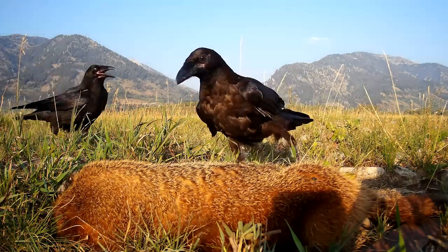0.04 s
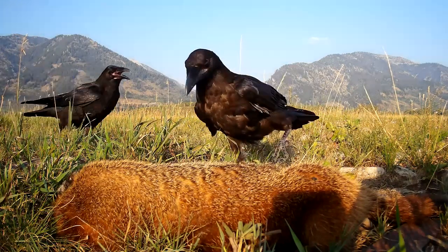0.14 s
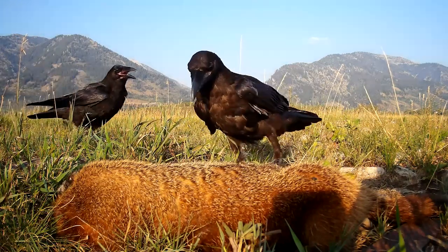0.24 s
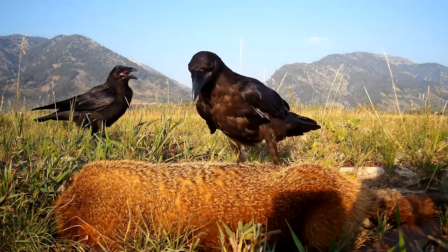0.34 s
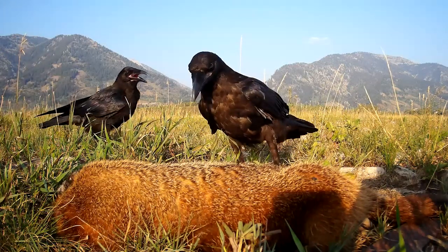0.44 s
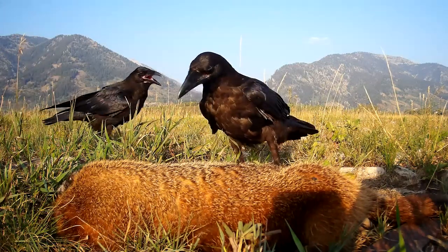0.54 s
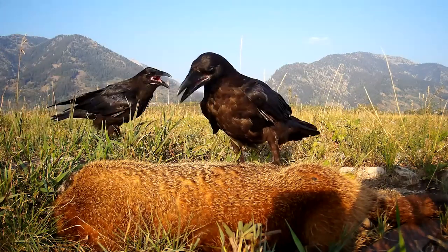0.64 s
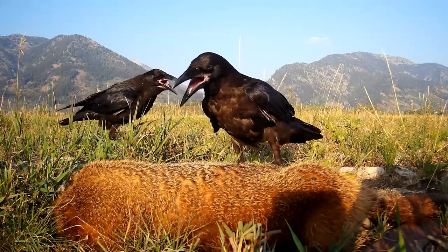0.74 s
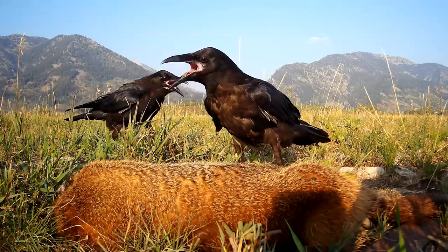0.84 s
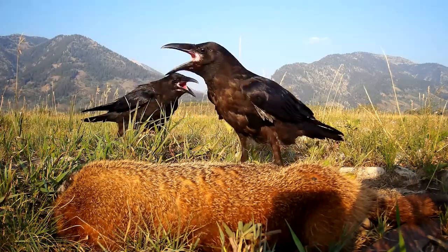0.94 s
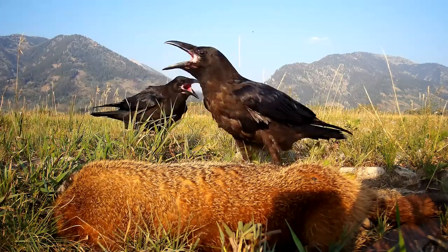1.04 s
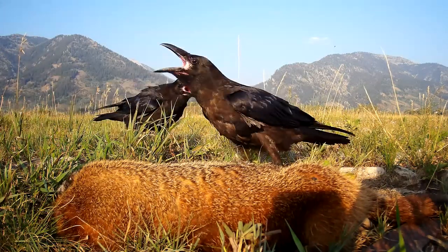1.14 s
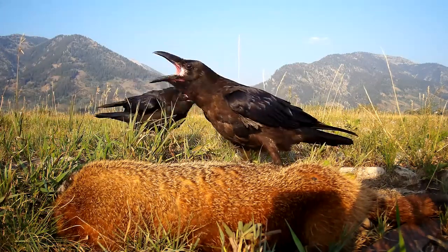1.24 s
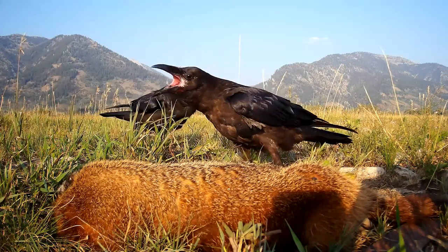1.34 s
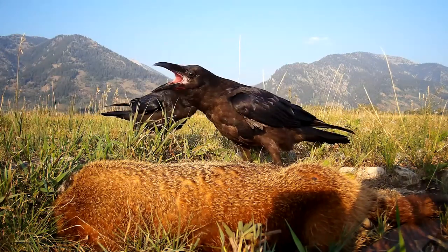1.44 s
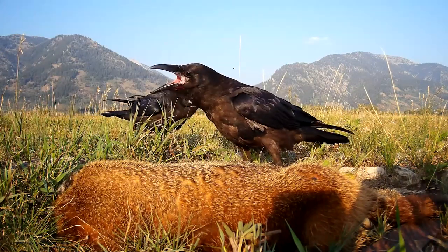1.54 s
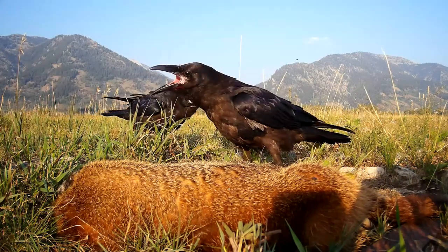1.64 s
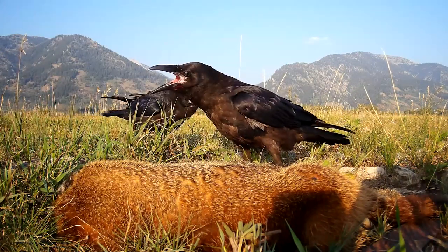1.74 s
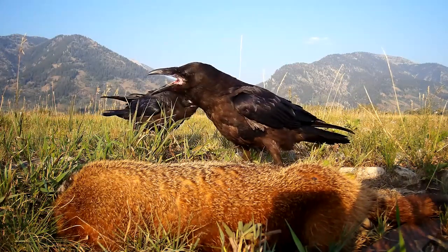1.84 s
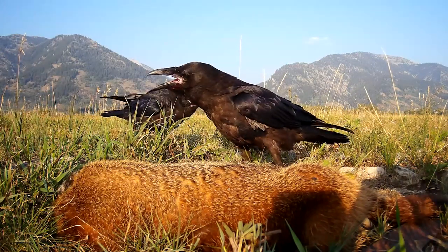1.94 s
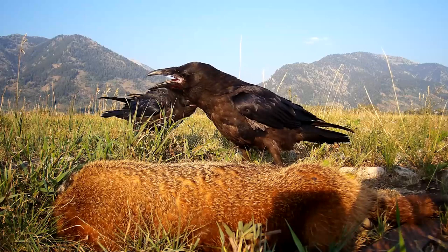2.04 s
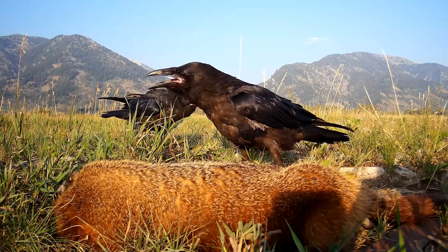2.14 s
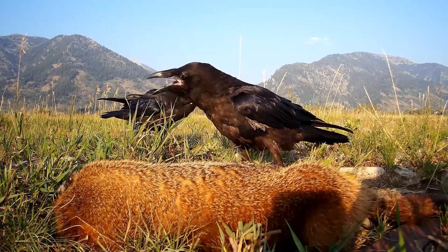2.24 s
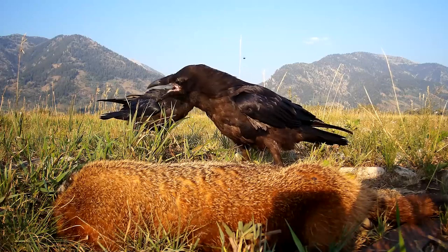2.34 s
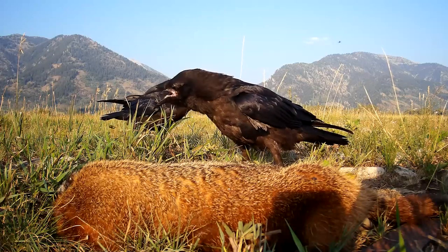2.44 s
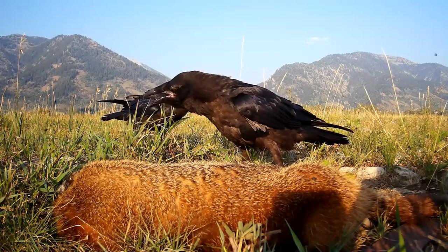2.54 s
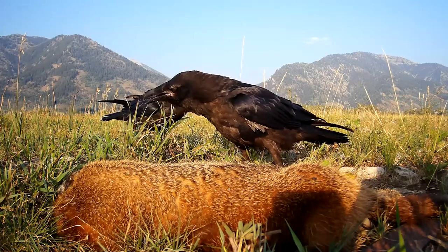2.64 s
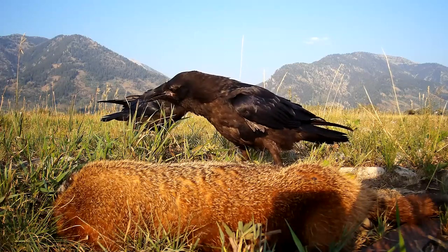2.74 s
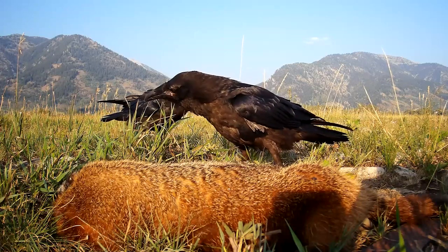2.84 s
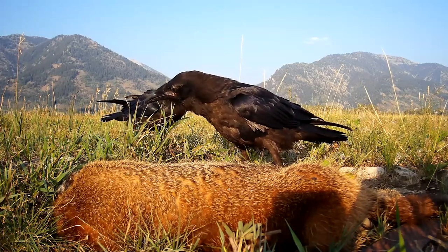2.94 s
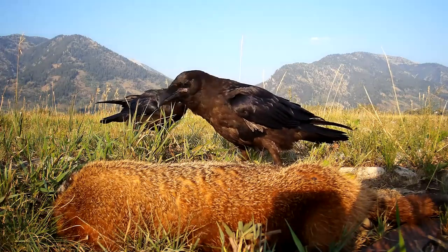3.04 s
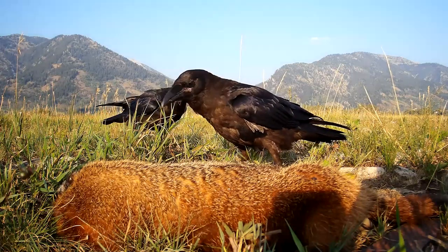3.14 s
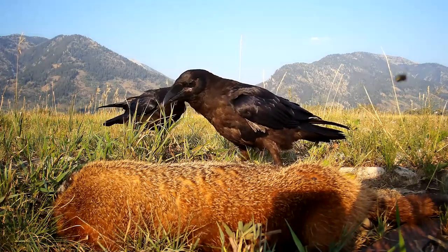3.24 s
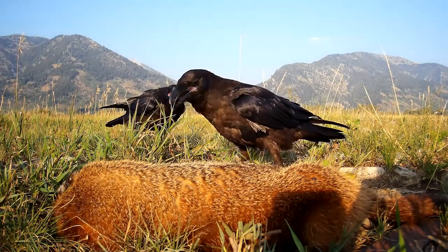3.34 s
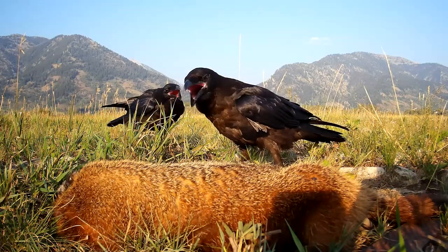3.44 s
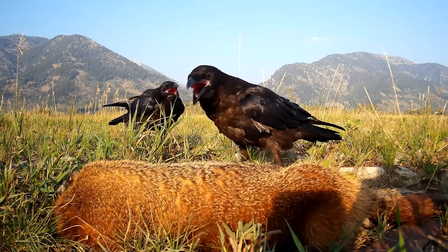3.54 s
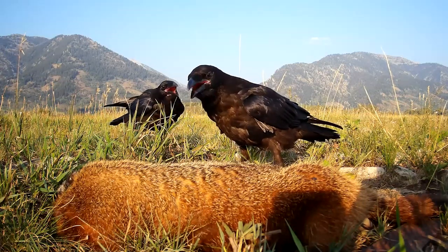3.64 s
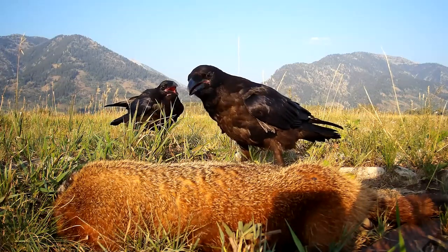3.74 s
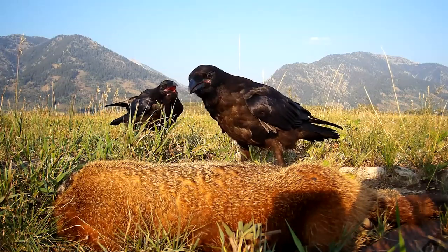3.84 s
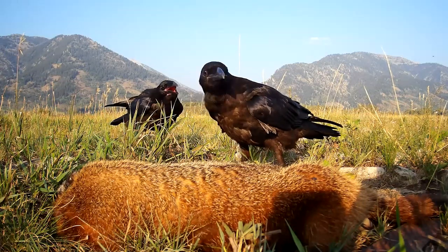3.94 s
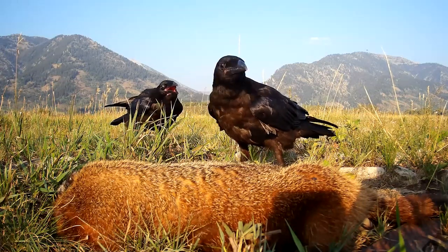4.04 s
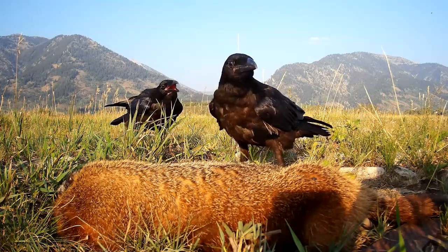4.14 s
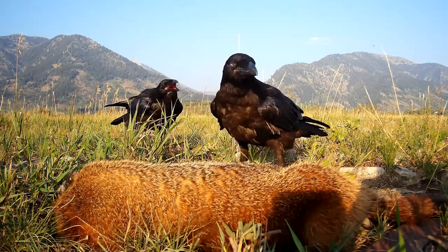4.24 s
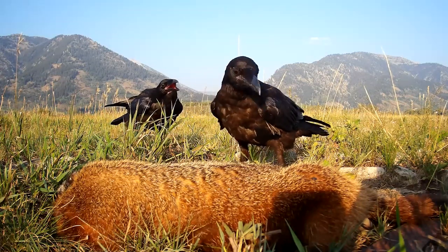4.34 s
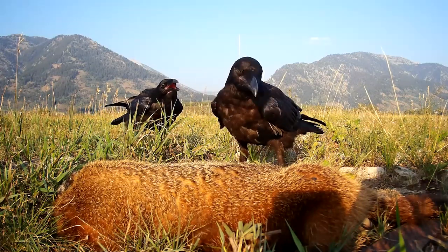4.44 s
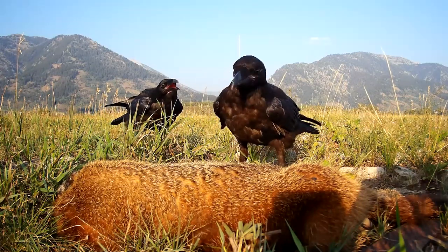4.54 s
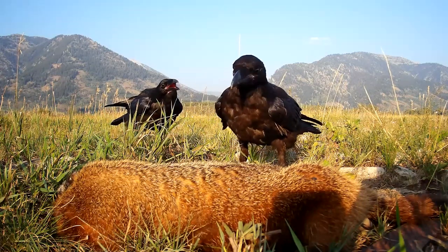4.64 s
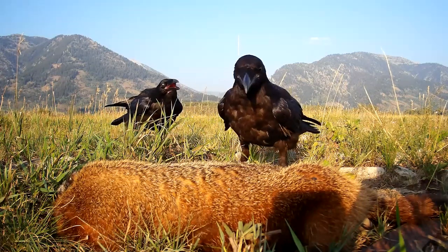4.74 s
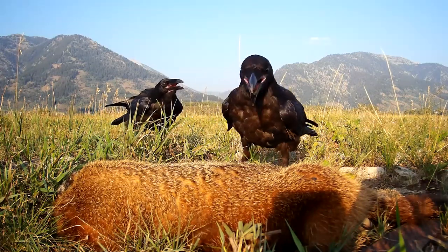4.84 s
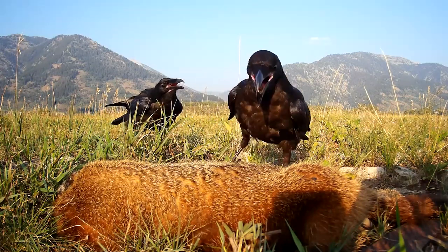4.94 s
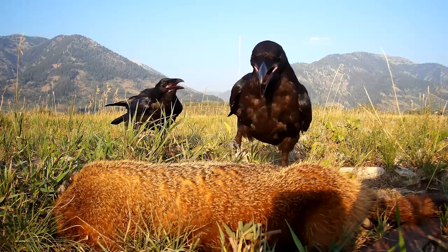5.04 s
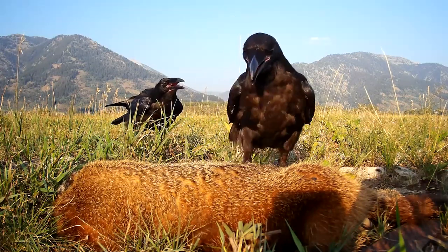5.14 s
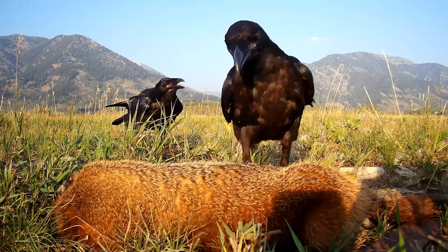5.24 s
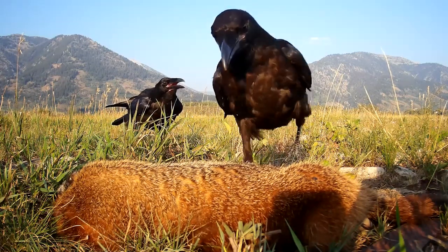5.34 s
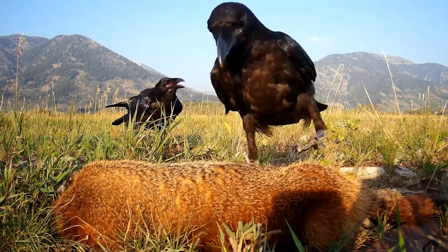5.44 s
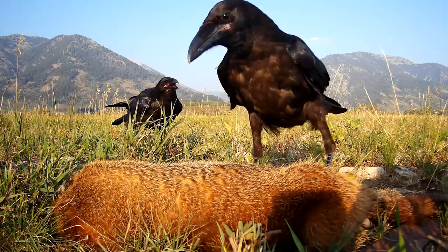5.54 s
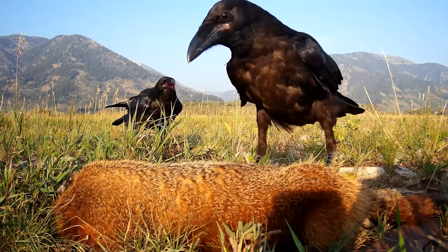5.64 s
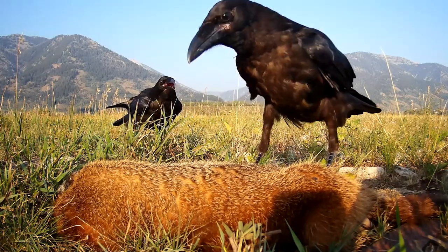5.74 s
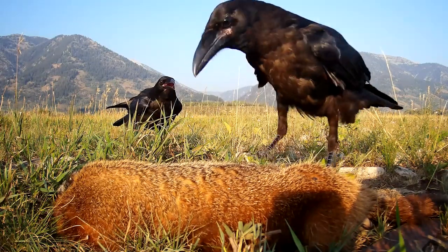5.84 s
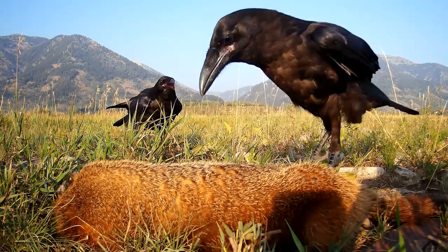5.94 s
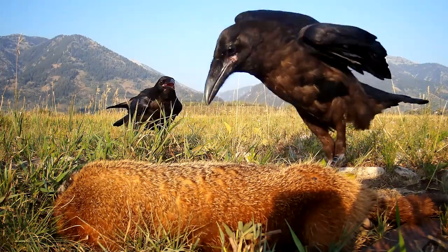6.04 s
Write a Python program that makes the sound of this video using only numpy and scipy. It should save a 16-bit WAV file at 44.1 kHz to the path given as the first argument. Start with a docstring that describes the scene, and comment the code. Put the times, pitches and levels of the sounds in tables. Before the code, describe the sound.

Hoarse, rasping raven caws overlap with a higher, clearer caller, then thin out to single falling croaks over very quiet outdoor air.

```python
"""Over still air, a far engine's drone and brushes in the grass, two young ravens beg in an open meadow.
A pop and a thin whistle lead into their first caws, one hoarse and low, one higher and clearer, at times together.
Each caw is a train of syrinx pulses: the pitch scoops up, drifts, flutters fast and slides down at the end;
voice and rasp weaken as it falls. A fly, a buzz of wingbeat harmonics, joins midway; a faint echo follows the birds.
The clear bird calls last near 3.3 s, the hoarse one near 5 s; grass, fly and engine remain."""
import sys
import numpy as np
from scipy import signal
from scipy.fft import rfft, irfft, next_fast_len
from scipy.io import wavfile
from scipy.ndimage import uniform_filter1d, map_coordinates

SR = 44100
rng = np.random.default_rng(int(sys.argv[2]) if len(sys.argv) > 2 else 0)


def output_pcm(signal):
    """Save a mono or channel-first signal as 16-bit PCM at the path in sys.argv[1].

    Samples are clipped to [-1, 1] before scaling.
    """
    pcm = np.clip(np.atleast_2d(signal).T, -1, 1) * 32767
    wavfile.write(sys.argv[1], SR, np.round(pcm).astype(np.int16))


N = 268128

# resonances of the hoarse bird's throat: (frequency [Hz], gain [dB])
HOARSE_THROAT_GAIN = [(80, -55.5), (160, -22), (280, -4.5), (380, -6.5), (490, -12.5), (620, -10),
                      (850, -8.5), (1250, -0.5), (1550, -2), (1750, -0.5), (1980, -7), (2200, -18.5),
                      (3300, -23)]


def amp(db):
    """Decibels to gain."""
    return 10 ** (np.asarray(db) / 20)


def unit(x):
    """Scale to rms 1."""
    return x / np.sqrt(np.mean(x ** 2) + 1e-20)


def along(points, hz):
    """Read (Hz, value) points on a log frequency axis."""
    f, v = np.transpose(points)
    return np.interp(np.log(hz + 1), np.log(f), v)


def curves(rows, t):
    """Read each column after the first at the times t."""
    s, *cols = np.transpose(rows)
    return [np.interp(t, s, c) for c in cols]


def wobble(t, knots_per_s):
    """Smooth random curve through normally distributed knots."""
    knots = (t - t[0]) * knots_per_s
    return map_coordinates(rng.standard_normal(int(knots[-1]) + 4), [knots])


def coloured(x, db_of_hz):
    """Causal minimum-phase filter with the given gain in dB, by folding the cepstrum."""
    m = 2 * next_fast_len(len(x) // 2 + 4096)
    cepstrum = irfft(np.log(amp(db_of_hz(np.fft.rfftfreq(m, 1 / SR)))), m)
    cepstrum[1:m // 2] *= 2
    cepstrum[m // 2 + 1:] = 0
    response = np.exp(rfft(cepstrum))
    return irfft(rfft(x, m) * response, m)[:len(x)]


def noise(spectrum):
    """Noise of rms 1 with the given spectrum."""
    return unit(coloured(rng.standard_normal(N), lambda hz: along(spectrum, hz)))


def steady(x, size):
    """Divide out the slow level, keep the flutter; size in samples."""
    power = uniform_filter1d(uniform_filter1d(x ** 2, size), size)
    return x / np.sqrt(np.abs(power) + 1e-12)


def ravens():
    """Hoarse and clear bird: each its own throat, beak and flutter shape."""
    # one row a caw, in four groups:
    # time: (start [s], end [s])
    # pitch: (aim [Hz], sag [Hz/s], opening scoop [share], closing slide [s])
    # effort: (voice [dB], rasp [dB], swell start to end [dB], attack [s], release [s],
    #          hardest push at [s], its surge [dB])
    # manner: (flutter at start [Hz], flutter at end [Hz], pitch swing [share], lower side [share],
    #          roughness [0-1], mouth at 1200 Hz [dB], mouth at 1750 Hz [dB],
    #          ring of the closing beak [Hz], its strength [dB])
    hoarse_caws = [ ((.772, 1.256), (752, 285, .39, .038), (-21.7, -28.3, 5.5, .0075, .004, .91, 4),
                   (66.03, 92, .046, .9, .05, 3.3, -1, 1730, 9.5)), ((1.355, 1.595), (665, 620, .29, .031),
                   (-25, -31.5, -1, .007, .009, 1.51, 2), (60.4, 56, .038, .76, .1, -.5, 0, 1850, 6)),
                   ((1.742, 1.913), (700, 1250, .27, .03), (-27, -35, 4.5, .007, .006, 1.765, 2),
                   (50, 56, .034, .69, .06, -1, .5, 1890, 2)), ((2.314, 2.6), (735, 560, .22, .044),
                   (-27.4, -40.5, 8, .005, .009, 2.52, 2.5), (67, 70, .034, .72, .05, 1, -3.5, 1610, 6.5)),
                   ((3.474, 3.655), (700, 1150, .31, .03), (-22.4, -30.5, -9.5, .008, .007, 3.51, 2.5),
                   (58, 52, .036, .7, .06, 1, -.5, 1720, -2.5)), ((4.942, 5.162), (692, 240, .15, .062),
                   (-25.5, -30.7, 1.5, .008, .004, 5.07, 2),
                   (96.1, 102, .044, .6, .14, -5.5, -1.5, 1770, 2))]
    clear_caws = [ ((.77, 1.09), (832, 0, 0, .056), (-31, -35, 0, .026, .008, .92, 2),
                  (69.48, 98, .09, .24, .1, 0, 5, 1400, -12)), ((1.262, 1.575), (795, -250, .125, .041),
                  (-25.5, -35.8, -.5, .01, .022, 1.42, 2), (52.3, 58, .05, .38, .45, .5, 6, 1650, 0)),
                  ((3.131, 3.462), (832, -130, 0, .056), (-24.8, -32.3, 12, .006, .028, 3.32, 6),
                  (70, 65, .06, .11, .09, -1, -1, 1620, -6))]
    # resonances of the clear bird's throat: (frequency [Hz], gain [dB])
    clear_throat = [(100, -50), (250, -28), (450, -7), (850, 1.5), (1200, -6), (1600, -0.5), (2100, -23),
                    (3100, -27)]
    # rasp colour of the open beak, one list per hoarse caw: (frequency [Hz], gain [dB])
    hoarse_beaks = [
        [(1650, -17), (2800, -10), (3810, -10.5), (4240, -4.5), (4860, 1), (5940, -3), (6420, -1.5), (8140, -9),
         (9120, -21), (10200, -19), (15500, -38)],
        [(1650, -24), (2800, -12), (3160, -16), (4150, -4), (5810, -2), (7680, -8), (9060, -23.5), (10800, -24),
         (11800, -35), (12800, -36), (15500, -44)],
        [(1650, -38.5), (2800, -9.5), (3190, -18.5), (4150, -1.5), (4890, -6), (5900, 0), (6760, -9),
         (7800, -10), (9260, -38), (14700, -40), (15500, -50.5)],
        [(1650, -32), (2800, -21), (3680, -10.5), (4460, 1), (5530, -8.5), (6330, -4), (7200, -20.5),
         (8430, -19), (9120, -48.5), (9940, -26), (12000, -29.5), (15500, -44)],
        [(1650, -16), (2800, -6), (3100, -20.5), (4330, -1), (4790, -9), (5410, 1.5), (6470, -6.5),
         (7150, -2.5), (9000, -18.5), (9320, -32), (10500, -15.5), (13100, -25), (15500, -26.5)],
        [(1650, -37), (2800, -6), (3620, -19), (4360, -0.5), (4620, -2.5), (5040, -11), (5940, 0),
         (6800, -11.5), (8020, -12), (8800, -31), (9530, -21), (10400, -24.5), (11500, -13), (15500, -38.5)],
    ]
    # the same for all clear caws: (frequency [Hz], gain [dB])
    clear_beak = [(2700, -15), (3050, -23), (3700, -13), (4400, -6.5), (5200, -1.2), (6300, -5.5),
                  (7300, -3), (9600, -19), (11700, -15), (14100, -23.5), (15500, -36)]
    # cracks in the hoarse voice: (time [s], boost [dB], half-length [s])
    voice_cracks = [(1.378, 11, .0045), (2.323, 5, .004), (2.380, 6, .0043), (2.411, 9.5, .003),
                    (3.488, 6.5, .0037)]
    hoarse = sum(caw(*row, beak, HOARSE_THROAT_GAIN, voice_cracks, rasp_fade_db_per_s=15,
                     spike=.5, lean=.25, throb_db=-.5, rasp_throb_db=2.5, rasp_lag_rad=1.2, scatter_s=.00001)
                 for row, beak in zip(hoarse_caws, hoarse_beaks))
    clear = sum(caw(*row, clear_beak, clear_throat, [], rasp_fade_db_per_s=2,
                    spike=.2, lean=.1, throb_db=3, rasp_throb_db=4.5, rasp_lag_rad=-.9, scatter_s=.000004)
                for row in clear_caws)
    return hoarse + clear


def caw(time, pitch, effort, manner, beak, throat, cracks, rasp_fade_db_per_s, spike, lean,
        throb_db, rasp_throb_db, rasp_lag_rad, scatter_s):
    """The syrinx's two sides pulse at different rates and beat; throat shapes the voice, beak the rasp."""
    (first_hz, last_hz, swing, lower_share, rough,
     mouth_low_db, mouth_high_db, ring_hz, ring_db) = manner
    # rush of air under the voice: (frequency [Hz], gain [dB])
    gust_spectrum = [(25, 0), (60, 0), (130, -2), (200, 0), (350, -4), (600, -18), (1500, -50)]
    gust_db = -40.5  # relative to the voice
    crack_rasp_share = .5  # part of a crack's boost that reaches the rasp
    swing_fade = .35  # share of the pitch flutter lost over the caw
    slack_jitter, slack_flicker_db = .07, 4  # slack membranes stumble in pitch and strength
    span = np.arange(int(time[0] * SR), int(time[1] * SR))
    t = span / SR
    hz = pitch_arch(t, *pitch)
    voice_db, rasp_db = loudness(t, hz, *effort, rasp_fade_db_per_s)

    # a crack jumps up in strength and pitch
    crack_db = sum(db * np.exp(-((t - s) / length) ** 2) for s, db, length in cracks)
    hz = hz * (1 + .012 * crack_db)
    voice_db = voice_db + crack_db
    rasp_db = rasp_db + crack_rasp_share * crack_db

    beat_hz = np.linspace(first_hz, last_hz, len(t)) * (1 + .02 * wobble(t, 30))
    beat = np.cumsum(beat_hz) / SR  # cycles
    flutter = 2 * np.pi * beat
    # each beat kicks the pitch of both sides, less as the membranes slacken
    kick = np.exp(spike * np.cos(flutter + lean * np.cos(flutter)))
    tension = np.clip(hz / hz.max(), 0, 1) ** 1.5
    kick = unit(kick - kick.mean()) * tension * (1 + .12 * wobble(t, 60))
    slack = (1 - tension) ** 2
    jitter = (.007 + slack_jitter * (1 - tension) ** 1.5) * wobble(t, 250)
    swing_now = swing * np.linspace(1, 1 - swing_fade, len(t))

    upper = np.cumsum(hz * (1 + swing_now * kick + jitter)) / SR  # cycles
    lower = upper - beat + .5
    upper_pulses = pulses(upper, scatter_s, scatter_db=.25)
    lower_pulses = pulses(lower, scatter_s, scatter_db=.25)
    source = unit(upper_pulses + lower_share * tension * lower_pulses)
    # air tears through the syrinx once a cycle
    tear = rng.standard_normal(len(t)) * (1 + np.cos(2 * np.pi * upper)) ** 2
    torn_air = rough * unit(signal.lfilter(*signal.butter(2, 900, "high", fs=SR), tear))

    mouth = [(800, 0), (1200, mouth_low_db), (1750, mouth_high_db), (2400, 1), (2900, 1.5), (4000, -41.5)]
    throbbing = (source + torn_air) * amp(throb_db * kick)
    voice = coloured(throbbing, lambda f: along(throat, f) + along(mouth, f))
    # the beak closes from 40 % to 95 % of the caw; a narrow resonance grows
    closing = np.clip((np.linspace(0, 1, len(t)) - .4) / 0.55, 0, 1)
    ring = signal.lfilter(*signal.iirpeak(ring_hz, 9, SR), voice)
    voice = voice + amp(ring_db) * closing * ring

    hiss = (source + 4 * torn_air) * amp(rasp_throb_db * tension * np.cos(flutter - rasp_lag_rad))
    rasp_tilt = [(500, -50.5), (2000, -20), (2900, 1), (4400, 0), (7000, 0), (12500, -1.5)]  # (Hz, dB)
    rasp = coloured(hiss, lambda f: along(beak, f) + along(rasp_tilt, f))
    rasp = scattered(rasp, share=.45, t60_s=.015)
    gust = unit(coloured(rng.standard_normal(len(t)), lambda f: along(gust_spectrum, f)))

    sound = amp(voice_db) * (steady(voice, size=900) + amp(gust_db) * gust)
    sound = sound + amp(rasp_db) * steady(rasp, size=900)
    flicker = amp((.89 + slack_flicker_db * slack) * wobble(t, 70))
    out = np.zeros(N)
    out[span] = sound * flicker * signal.windows.tukey(len(t), .03)
    return out


def pitch_arch(t, aim_hz, sag_hz_per_s, scoop, slide_s):
    """Pitch scoops up to its aim, drifts, and slides down as the caw runs out."""
    scoop_s, slide_share, slide_shape = .03, .55, 1.8  # rise time; pitch lost at the end; abruptness
    age, left = t - t[0], t[-1] - t
    opening = 1 - scoop * np.exp(-age / scoop_s)
    closing = 1 - slide_share * np.exp(-(left / slide_s) ** slide_shape)
    return (aim_hz - sag_hz_per_s * age) * opening * closing


def loudness(t, hz, voice_db, rasp_db, swell_db, attack_s, release_s, push_s, surge_db, rasp_fade_db_per_s):
    """Voice and rasp in dB: attack, swell with one harder push, release; low pitch is weaker and duller."""
    attack_db, release_db = 16, 39  # depth below the full level at start and end
    surge_width, surge_voice_share = .17, .3  # half-length as share of the caw; part reaching the voice
    voice_db_per_octave, rasp_db_per_octave = 9.9, 19
    age, left = t - t[0], t[-1] - t
    effort_db = swell_db * np.linspace(-.5, .5, len(t))
    effort_db = effort_db - attack_db * np.exp(-age / attack_s) - release_db * np.exp(-left / release_s)
    push_db = surge_db * np.exp(-((t - push_s) / (surge_width * age[-1])) ** 2)
    octaves = np.log2(hz / hz.max())
    voice_now_db = voice_db + effort_db + surge_voice_share * push_db + voice_db_per_octave * octaves
    rasp_now_db = rasp_db + effort_db + push_db + rasp_db_per_octave * octaves
    return voice_now_db, rasp_now_db - rasp_fade_db_per_s * (t - t.mean())


def pulses(turns, scatter_s, scatter_db):
    """One band-limited pulse per whole turn, a little uneven in time and size."""
    at = np.interp(np.arange(1, int(turns[-1])), turns, np.arange(len(turns)))
    late, big = rng.standard_normal((len(at), 2)).T
    at = (at + scatter_s * SR * late)[:, None]
    # windowed sinc places each pulse between samples
    taps = np.floor(at).astype(int) + np.arange(-7, 9)
    shape = np.sinc(taps - at) * np.cos(np.pi * (taps - at) / 16) ** 2
    sized = shape * amp(scatter_db * big)[:, None]
    return np.bincount(np.clip(taps, 0, len(turns) - 1).ravel(), sized.ravel(), len(turns))


def scattered(x, share, t60_s):
    """Grass stems close by smear each pulse over a few milliseconds: decaying-noise convolution."""
    t = np.arange(512) / SR
    stems = rng.standard_normal(len(t)) * amp(-60 * t / t60_s)
    return x + share * signal.fftconvolve(x, stems / np.linalg.norm(stems))[:len(x)]


def pops():
    """The syrinx pops open: one decaying puff rings the throat."""
    # (time [s], peak level [dB])
    pop_times = [(.717, -42), (.769, -28), (1.256, -36), (1.267, -24), (1.735, -29), (2.307, -31),
                 (3.068, -47), (3.473, -18), (4.938, -26.5)]
    tilt = [(280, -5), (600, 3), (1700, 1), (3300, -4), (5000, 0), (8000, -5), (10000, -25)]  # (Hz, dB)
    out, t = np.zeros(N), np.arange(2048) / SR
    for s, db in pop_times:
        puff = rng.standard_normal(len(t)) * amp(-60 * t / 0.038)
        puff[0] += 6
        ring = coloured(puff, lambda f: along(HOARSE_THROAT_GAIN, f) + along(tilt, f))
        out[round(s * SR):][:len(t)] += amp(db) * ring / np.abs(ring).max()
    return out


def whistles(rise_db):
    """The clear voice starts as a thin wavering sine that swells before it breaks into a caw."""
    # (start [s], end [s], frequency [Hz], level at the end [dB])
    whistle_rows = [(.725, .78, 880, -53), (3.082, 3.138, 930, -50)]
    out = np.zeros(N)
    for start, end, hz, db in whistle_rows:
        span = np.arange(int(start * SR), int(end * SR))
        wavering_hz = hz * (1 + .025 * wobble(span / SR, 150))
        tone = np.sin(2 * np.pi * np.cumsum(wavering_hz) / SR)
        swell = amp(db + np.linspace(-rise_db, 0, len(span)))
        out[span] = unit(tone) * swell * signal.windows.tukey(len(span), .2)
    return out


def meadow(x):
    """Scattered echo: decaying noise whose treble dies first."""
    # (frequency [Hz], t60 [s])
    echo_t60 = [(200, 1), (1500, 0.42), (5000, .45), (12000, 0.24)]
    hz, t, z = signal.stft(rng.standard_normal(SR), SR, nperseg=256)
    decay = amp(-60 * t / along(echo_t60, hz)[:, None])
    tail = signal.istft(z * decay, SR, nperseg=256)[1]
    return signal.fftconvolve(x, tail / np.linalg.norm(tail))[:N]


def grass(t):
    """A foot or wing brushes the grass: noise rises quickly and dies away, crackling unevenly."""
    # (time [s], length [s], level [dB])
    brush_rows = [(.008, .03, -77), (.08, .2, -76), (.365, .06, -72), (3.88, .025, -81), (4.07, .03, -80),
                  (4.18, .09, -78), (4.285, .13, -74), (5.2, .2, -77), (5.37, .05, -78), (5.445, .05, -71),
                  (5.884, .025, -72), (5.92, .14, -79)]
    # (frequency [Hz], gain [dB])
    blade_spectrum = [(1500, -24.5), (4000, -5.5), (7000, -2), (10000, -7), (15000, -11)]
    rise_share, fade_db, stir_db = .2, 11, -88  # rising part; fall over one length; stirring in between
    push = np.full(N, amp(stir_db))
    for s, length_s, db in brush_rows:
        through = np.maximum(t - s, 0) / length_s
        fade = amp(db - fade_db * np.maximum(through - rise_share, 0))
        push += fade * np.minimum(through / rise_share, 1)
    return push * unit(noise(blade_spectrum) * amp(3 * wobble(t, 120)))


def fly(t):
    """Wing buzz: harmonics 2 to 7 of a drifting wingbeat."""
    # (time [s], wingbeat [Hz], level [dB])
    fly_track = [(2.5, 217, -100), (2.75, 222, -79.5), (3.1, 213, -81.5), (3.9, 221.6, -85.5),
                 (4.4, 222, -100), (4.7, 220, -78), (5.4, 217.6, -82.5), (5.8, 212.2, -95)]
    wing_hz, fly_db = curves(fly_track, t)
    wing = 2 * np.pi * np.cumsum(wing_hz * (1 + .01 * wobble(t, 2))) / SR
    return amp(fly_db) * unit(sum(np.sin(k * wing) / k for k in range(2, 8)))


def engine(t):
    """Far drone: a wavering shaft tone and its weak octave."""
    # (time [s], shaft frequency [Hz], level before a 4 dB cut [dB])
    engine_track = [(0, 82.97, -74), (.4, 83.03, -68), (1.2, 85, -64), (1.8, 90, -62), (2.3, 104, -64.5),
                    (3.6, 108.1, -64), (4.5, 110.1, -72), (6.08, 105.8, -73)]
    engine_hz, engine_db = curves(engine_track, t)
    shaft = 2 * np.pi * np.cumsum(engine_hz * (1 + .01 * wobble(t, 8))) / SR
    level = amp(engine_db - 4 + 1.5 * wobble(t, 8.3))
    return level * unit(np.sin(shaft) + .15 * np.sin(2 * shaft))


def still_air():
    """Steady, mostly low noise."""
    # (frequency [Hz], gain [dB])
    air_spectrum = [(12, -44.5), (20, -14), (38, -13), (74, -1.5), (119, -5), (140, -14.5), (161, -9),
                    (362, -19.5), (439, -17), (491, -23), (686, -22.5), (1450, -29), (15500, -31.5)]
    return amp(-67.5) * noise(air_spectrum)


def scene():
    """The birds close by, the meadow around them."""
    t = np.arange(N) / SR
    birds = ravens() + pops() + whistles(rise_db=21)
    echo = amp(-44) * meadow(birds)
    return (birds + echo + grass(t) + still_air() + engine(t) + fly(t))[None]


def record(dry):
    """Round the highest peaks off softly, then cut everything above the band limit."""
    ceiling, top_hz = .37, 15750
    rounded = dry / (1 + (dry / ceiling) ** 6) ** (1 / 6)
    m = next_fast_len(N + 8192)
    passed = np.fft.rfftfreq(m, 1 / SR) < top_hz
    return irfft(rfft(rounded, m) * passed, m)[:, :N]


dry = scene()
out = record(dry)
output_pcm(out)
```